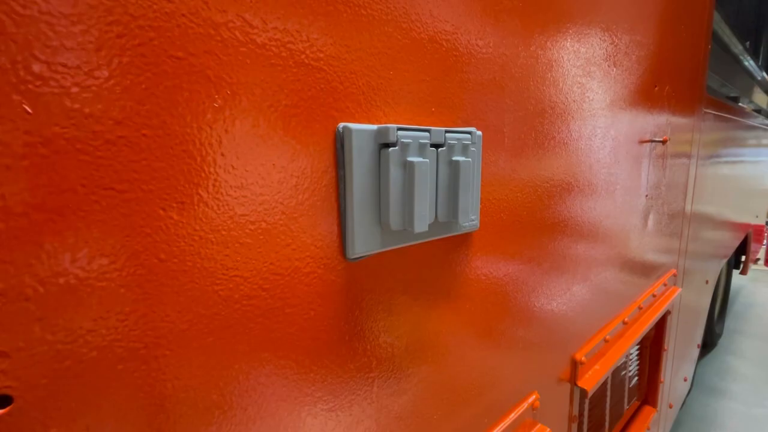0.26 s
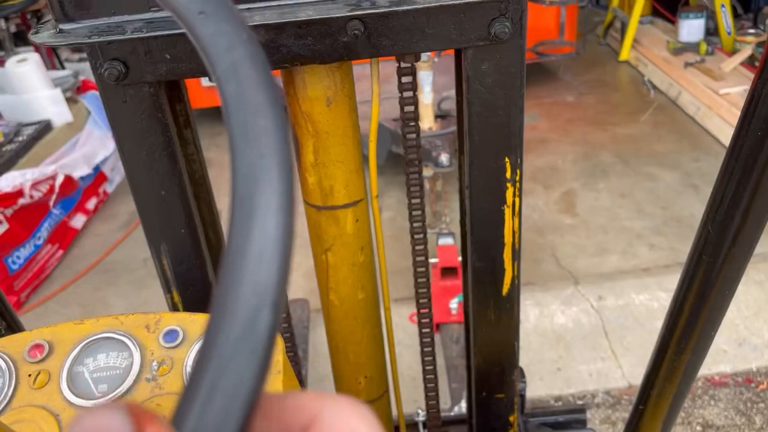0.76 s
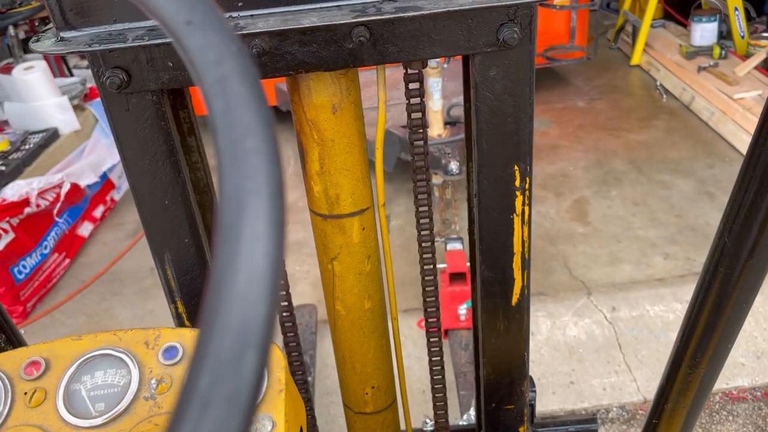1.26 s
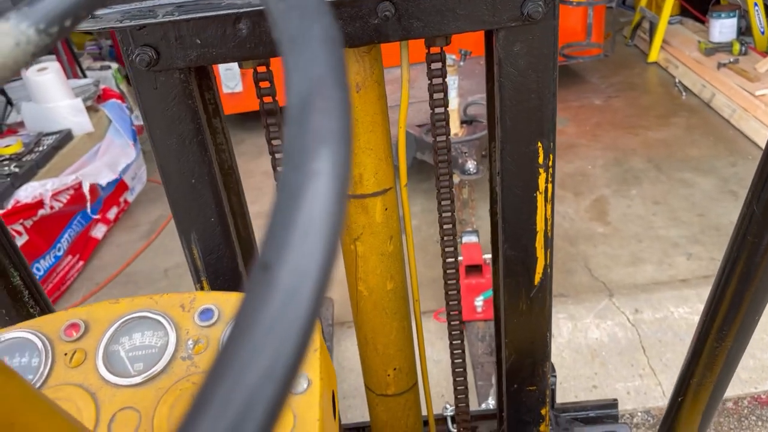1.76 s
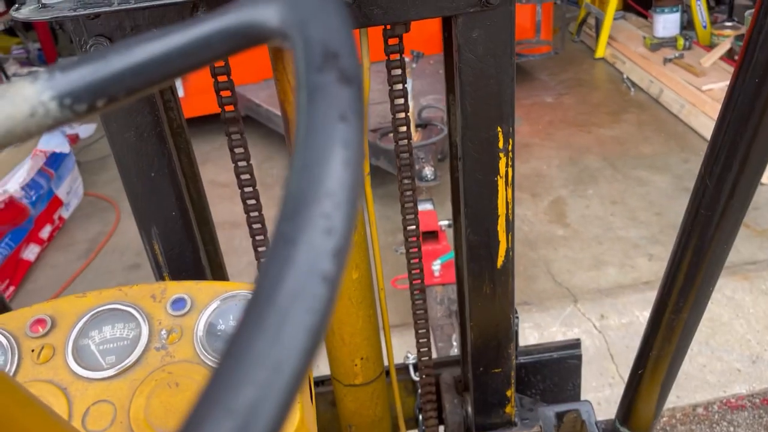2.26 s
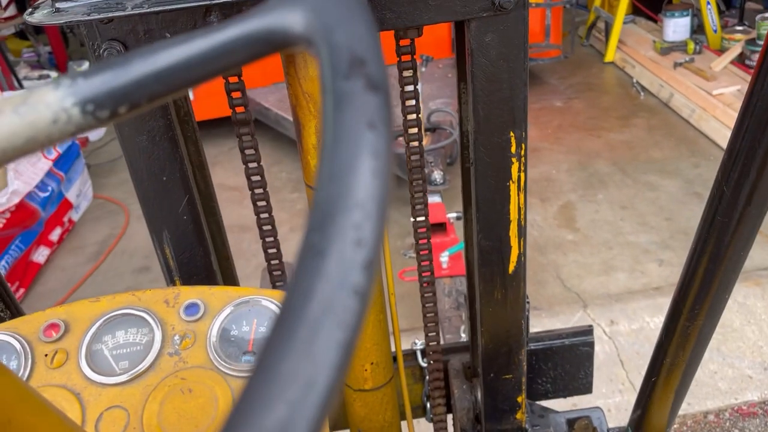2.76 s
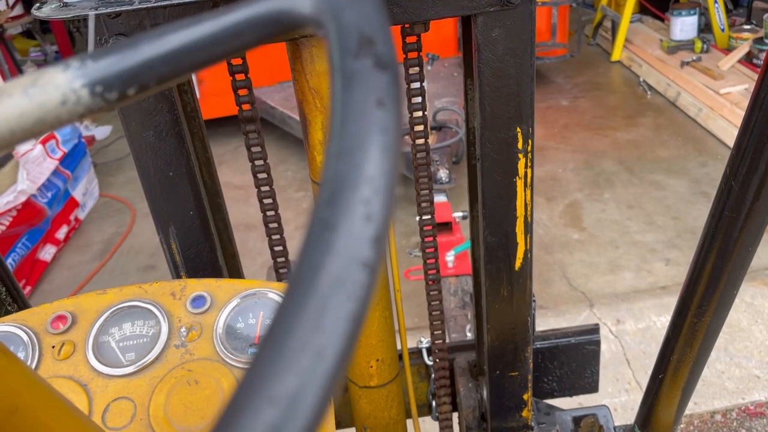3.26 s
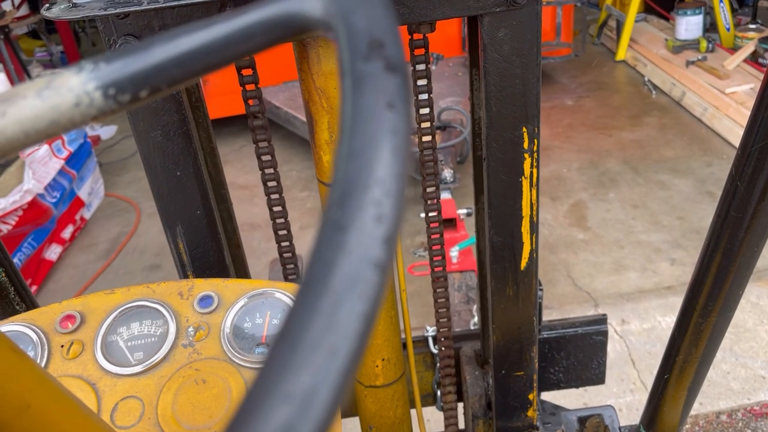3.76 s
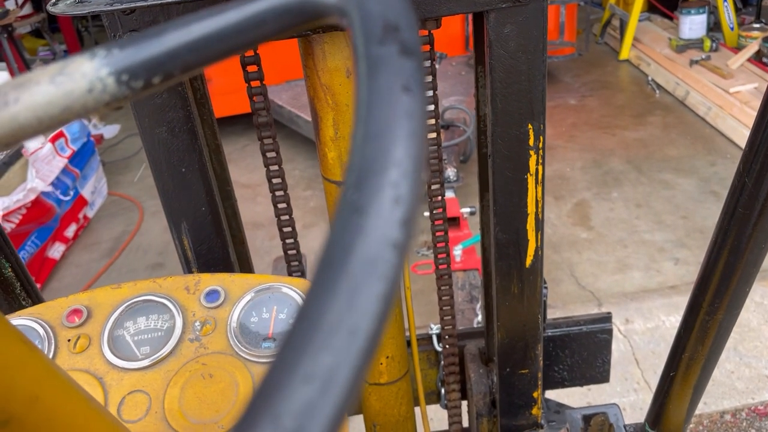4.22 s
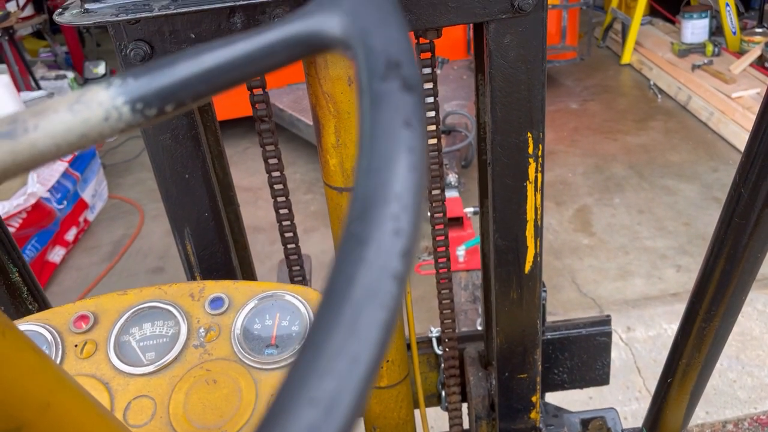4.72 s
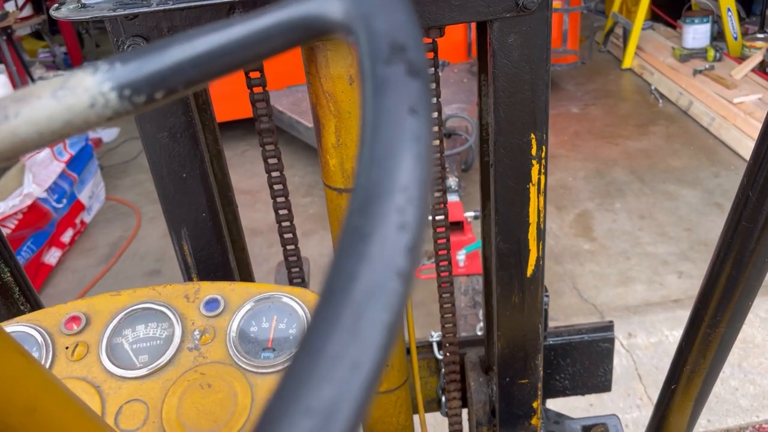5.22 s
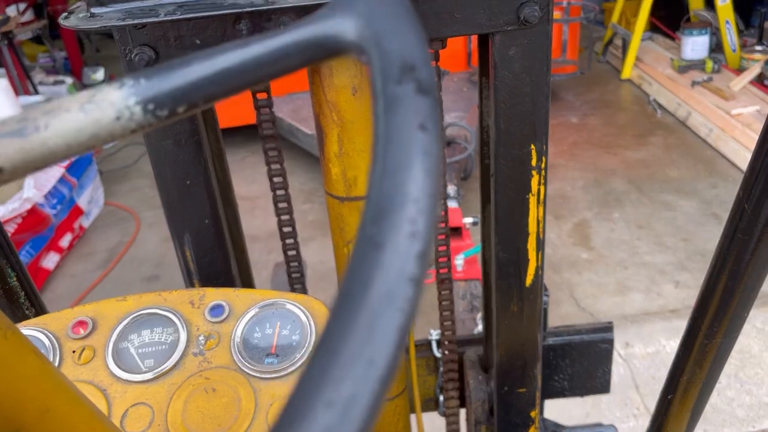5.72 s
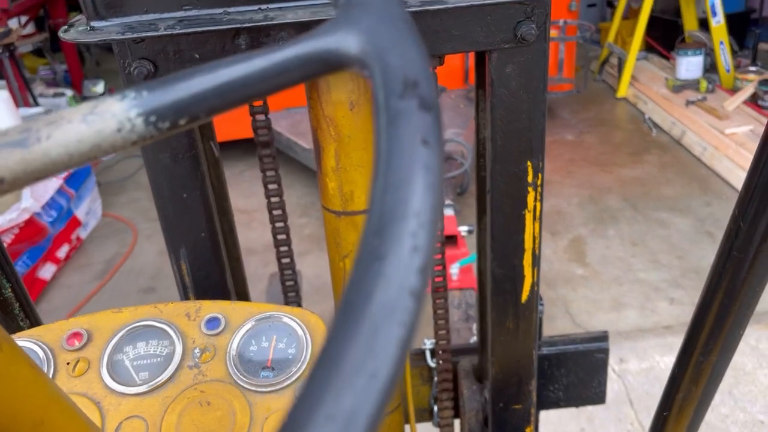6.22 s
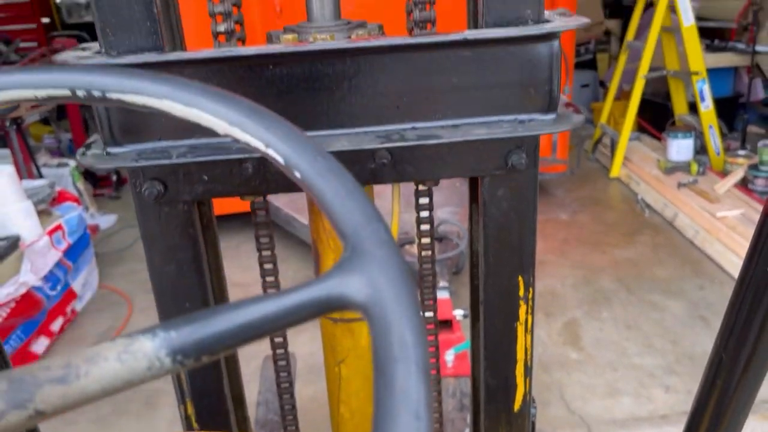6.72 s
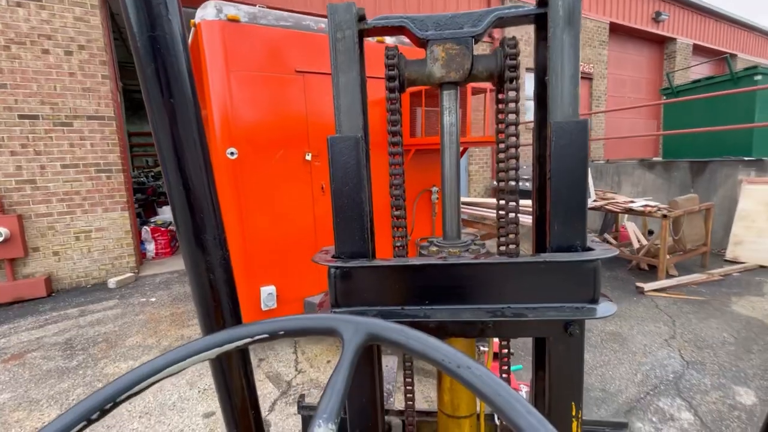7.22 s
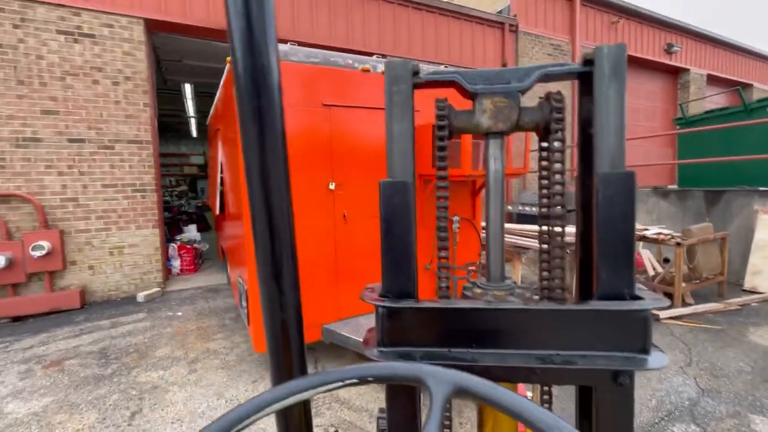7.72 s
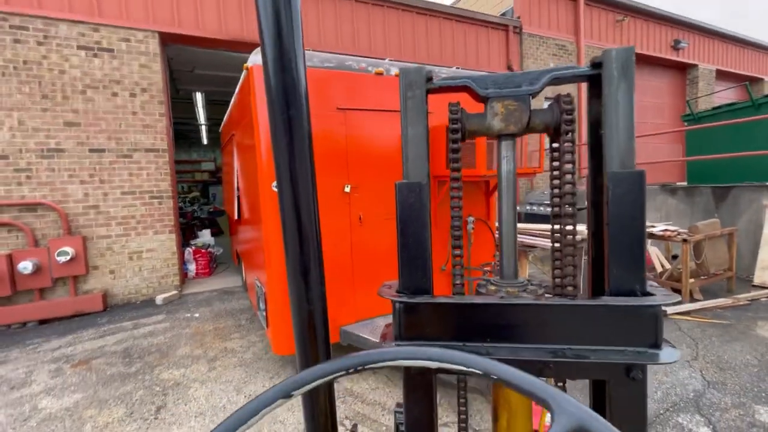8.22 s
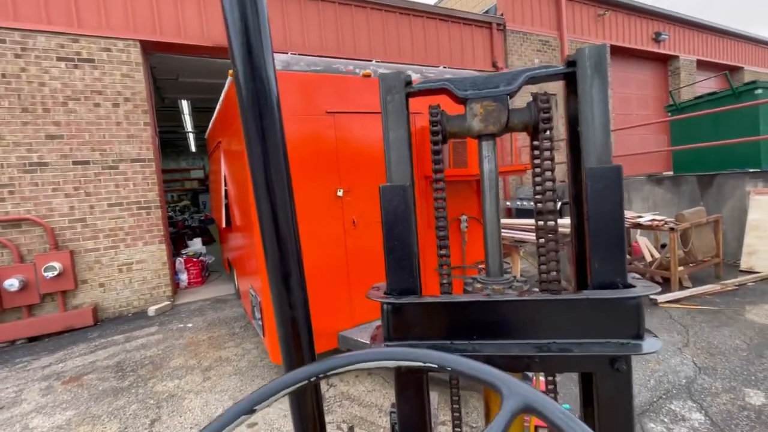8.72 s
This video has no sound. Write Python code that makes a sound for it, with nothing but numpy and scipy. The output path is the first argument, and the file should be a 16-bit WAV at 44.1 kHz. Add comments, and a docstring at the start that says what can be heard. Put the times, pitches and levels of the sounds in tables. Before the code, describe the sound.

A faint, distant low hum hangs over a yard outside a workshop. At about 0.6 seconds an old four-cylinder forklift engine is suddenly there, close, heard from the driver's seat. It runs unevenly, with dull spits until 1.2 seconds, and steadies by 1.5 seconds into a low, throbbing idle with a regular hollow knock, rattling loose steel and ticking valves. A faint click comes near 2 seconds. From 4.5 seconds the engine picks up speed. A light clank at 5.7 seconds and a heavy steel clank at 5.9 mark the gear engaging, and the speed creeps higher. At 6.9 seconds, with a soft low bump, the sound jumps to a slightly different position, with more clatter. The engine eases back until about 8.2 seconds, then revs sharply with a louder growl, staying high to the end at 9 seconds.

```python
"""Outside a workshop, in the driver's seat of an old four-cylinder forklift.
After a distant hum the engine is suddenly there, spitting while cold; it idles, picks up, clanks into
gear, settles and, heard from a second spot, revs again. The firings are a periodic excitation: their
harmonics (orders) throb in silencer and body, and each impulse rings the exhaust pipe, the sheet-metal
hood and loose steel. One cylinder hits harder than the rest and so accents every fourth firing."""
import sys
import numpy as np
from scipy import signal
from scipy.fft import rfft, irfft, next_fast_len
from scipy.io import wavfile
from scipy.ndimage import uniform_filter1d, minimum_filter1d, map_coordinates

SR = 44100
rng = np.random.default_rng(int(sys.argv[2]) if len(sys.argv) > 2 else 0)


def store_wav(level_fs):
    """Save 16-bit WAV to argv[1]."""
    pcm = np.round(np.clip(np.atleast_2d(level_fs), -1, 1) * 32767)
    wavfile.write(sys.argv[1], SR, pcm.T.astype(np.int16))


N = 396018

# Levels within a spectrum or a set of modes are relative; t60 is the time of a 60 dB decay.
# likeness of the two ears: f/Hz, coherence/1
COHERENCE = [(60, 0.99), (360, 0.9), (650, 0.22), (1300, 0.35), (2500, 0.47), (5000, 0.39), (8500, 0.53),
             (12000, 0.22)]
# outdoor noise spectrum and partials of the distant hum: f/Hz, level/dB
YARD_SPECTRUM = [(15, -40), (25, -38), (60, 4.5), (108, -7), (257, -7.5), (563, -20), (878, -11.5),
                 (1080, -17.5), (2190, -21), (5480, -28), (6760, -30.5), (10800, -54.5), (13000, -47)]
HUM_PARTIALS = [(57.3, -50), (114.7, -72)]
# soft low bumps with faint clicks where the sound jumps: t/s, bump width/s, bump level/dB, click level/dB
BUMP_EVENTS = [(1.96, .004, -50, -42), (6.893, .008, -28, -40)]
# spits of the cold engine: t/s, level/dB
SPIT_EVENTS = [(.643, -27), (0.695, -28), (.703, -35), (.817, -31.5), (0.889, -30), (0.908, -29.5),
               (1.032, -26), (1.142, -32), (1.189, -33)]
# heavy steel clanks: t/s, level/dB, relative treble level/dB, t60/s
CLANK_EVENTS = [(5.702, -31, -8, 0.11), (5.709, -31.5, -0.5, 0.084), (5.865, -15.5, -20.5, 0.086),
                (5.877, -23.5, -9, 0.11), (5.889, -32, -10, .08), (5.912, -34, -17, 0.17)]

# spectra that colour each source: f/Hz, level/dB
SPIT_SPECTRUM = [(60, -12), (150, 4), (260, -2), (420, 3), (570, -4), (700, -19), (1000, -30), (3000, -55)]
CLANK_SPECTRUM = [(250, 12), (500, 11.5), (900, -1), (1300, -10), (1700, -2), (2300, 2), (2900, 1),
                  (3300, -10), (3800, -11.5), (8000, -22)]
FAN_SPECTRUM = [(150, -5), (330, 1), (550, 2), (1100, -3), (2500, -12.5), (6000, -9.5), (9000, -19),
                (12500, -33)]
RUMBLE_SPECTRUM = [(15, -48), (40, 7.5), (90, 13), (180, -15.5), (400, -66)]
RATTLE_SPECTRUM = [(300, -2), (520, -0.5), (800, 2.5), (1300, -4), (2300, -5.5), (3000, -19), (4500, -61)]
TICK_SPECTRUM = [(1500, -20.5), (2800, -9), (3500, -0.5), (4400, -0.5), (5100, 1.5), (5900, -0.5),
                 (6800, -10.5), (8600, -10), (11300, -8), (12500, -24.5), (13400, -62)]
SNARL_SPECTRUM = [(150, -2.5), (200, 3.5), (250, -21.5), (335, -0.5), (400, -0.5), (490, -6), (620, -22)]
CRACK_SPECTRUM = [(300, -21), (480, 23), (600, -5), (800, -36), (1500, -28), (3000, -54)]
HOLLOW_SPECTRUM = [(250, -17), (560, 5), (900, -15), (2000, -33)]
HOOD_SPECTRUM = [(100, -14), (330, 3.5), (400, 1), (600, -1), (1100, -6.5)]
PIPE_SPECTRUM = [(60, -12), (100, 1.5), (280, -4.5), (400, -2), (800, -37)]

# driven resonances of air columns and steel, and the faint whine of the cold engine: f/Hz, bandwidth/Hz,
# level/dB
SPIT_WHINE_MODES = [(830, 6.2, 18.5)]
CLANKING_STEEL_MODES = [(880, 160, 1), (1620, 260, -0.5), (2200, 330, 0.5), (2840, 280, 0), (3570, 200, -9)]
BLOCK_MODES = [(317, 64, 7), (493, 64, 1.5), (695, 89, -4), (887, 46, -1.5), (1093, 72, -6.5),
               (1334, 130, -7), (1757, 160, -6.5), (2060, 190, -10.5), (2540, 79, -8), (2977, 110, -8.5),
               (3410, 140, -12)]
HOLLOW_MODES = [(591, 16, -5), (732, 30, -17), (880, 25, -12)]
HOOD_MODES = [(260, 18, -21.5), (412, 17.8, 2.5), (463, 24, -6.5), (523, 47, -12)]
PIPE_MODES = [(105.4, 23, -3.5), (203.8, 40, -1.5), (268, 85, -5.5), (324, 57, -14.5)]
SILENCER_MODES = [(61.6, 27.2, 0)]
FLOOR_MODES = [(89.1, 7, -35.5)]
COWL_MODES = [(120, 15, 0)]
DRONE_MODES = [(210, 12.3, 0)]
# free vibration of loose brackets, valve cover and hood: f/Hz, level/dB, t60/s
BRACKET_RINGS = [(1065, -0.5, 0.1), (1255, 7, 0.15), (1329, 10, 0.11), (1634, 8, 0.1), (1738, 8, 0.12),
                 (1895, 8, 0.1), (2135, 0, 0.17), (2333, 7, 0.11), (2470, 6, 0.12), (2736, 3.5, 0.11)]
COVER_RINGS = [(3170, 5, 0.076), (3367, 2.5, 0.083), (3677, 0.5, 0.072), (3887, 0.5, 0.088),
               (4110, 0, 0.097), (4375, 6, 0.084), (4650, 5.5, 0.077), (5330, 7.5, 0.058),
               (5720, 5.5, 0.079), (5930, 7, 0.061), (6380, 5, 0.04), (8140, 2, 0.045), (8800, 4, 0.04)]
HOOD_RINGS = [(420, 0, .17), (475, -2, .07)]

# engine speed: t/s, firing rate/Hz
FIRING_RATE = [(0.56, 22.44), (0.9, 22.81), (1.4, 21.76), (2.04, 22.61), (4.08, 22.34), (4.55, 22.62),
               (5.3, 27.8), (5.81, 28.72), (6.03, 28.7), (6.49, 30.67), (7.04, 31.1), (7.44, 28.06),
               (7.81, 26.33), (8.17, 25.72), (8.37, 27.01), (8.81, 41.05), (8.98, 41.91)]
# the sound cuts in, then jumps twice to another moment of the run:
# t/s, crank offset/firings, left-ear lag/ms
SOUND_JUMPS = [(.561, 1.468, .02), (1.96, 2.988, .02), (6.89, 3.681, .27)]
# load set by the throttle, negative when coasting: t/s, pull/1
THROTTLE_PULL = [(1.4, -0.0014), (2.1, 0.042), (4.45, 0.095), (4.65, 0.24), (5.2, 0.11), (5.6, 0.07),
                 (6.1, 0.097), (6.85, 0.2), (7.3, -0.36), (7.9, -0.25), (8.33, 0.15), (8.43, 0.67),
                 (8.65, 0.75), (8.98, 0.56)]
# cylinders in firing order: exhaust level/dB, hood level/dB, rattle level/dB, knock delay/firings
CYLINDER_BLOWS = [(-4.5, -2, 3.5, -0.012), (-3.5, 1.5, 6.5, 0.0233), (-5.5, -0.5, 5, -0.022),
                  (-4.5, -1, 3.7, -0.024)]
# each part's level law: idle level/dB, then change/dB per octave of speed, at full pull, while cold,
# in gear and at the second spot
PART_LEVELS = {"second order": (-26.5, 8, 1, -2, -3.5, 0.5), "third order": (-26, 2, 7, -1, -3, 2.5),
               "fifth order": (-40.5, -11, 7, -2, -2, -1.5), "cowl": (-45, 4, 1, -2, 2, 7.5),
               "drone": (-53, -1, 14, -2, 13, -7.5), "upper orders": (-58.5, 10, 14.5, 1, 3.5, -2.5),
               "fan": (-55, 18, 8, -2, -7.5, -1), "exhaust": (-35.5, -1.5, 5.5, 1.5, 0.5, -3),
               "hood": (-40.5, 1.5, 3, -2, -2, -6.5), "hollow knock": (-56, -7.5, 1, 5, -1, 9),
               "growl": (-51, 7, 16, 3, -3, 1.5), "rattle": (-48.5, 5.5, 7.5, 0.5, -6, 6),
               "valve ticks": (-48, -0.5, 11.5, 0, -5, 4), "unevenness": (-3, 3.5, -1, 9, -0.5, 1.5)}
# microphone response at the first spot and at the second, with the engine to one side: f/Hz, gain/dB
FACING_RESPONSE = [(6200, -0.5), (6800, -4), (7500, 1.5), (8200, 6.5), (9400, 6.5), (10300, -13.5),
                   (11000, -1)]
TURNED_RESPONSE = [(1600, 0.5), (1790, 0.5), (2000, 0), (4300, -2.5), (5800, 1.5), (6700, 2), (7350, -2.5),
                   (8200, 5), (9400, 11.5), (10500, -12.5), (11400, 4), (12300, 3)]

ENGINE_HEARD_S, SECOND_SPOT_S = SOUND_JUMPS[0][0], SOUND_JUMPS[-1][0]
IDLE_HZ = 22.5  # firing rate
WARM_S, CLEARING_S = 1.48, 0.17  # uneven cold burning is over at WARM_S
GEAR_S, GEAR_TAKE_UP_S = 5.87, 0.056  # the drive engages and takes up the slack in loose parts
TIME = np.arange(N) / SR


def amp(db):
    """Amplitude ratio of a level in decibels."""
    return 10 ** (np.asarray(db) / 20)


def unit(x):
    """Normalisation to rms 1."""
    return x / np.sqrt(np.mean(x ** 2) + 1e-20)


def noise():
    """Two uncorrelated channels of white noise."""
    return rng.standard_normal((2, N))


def along(points, hz):
    """Interpolation of (f/Hz, value) points on a logarithmic frequency axis."""
    f, values = np.transpose(points)
    return np.interp(np.log(hz + 1), np.log(f), values)


def curve(points):
    """Linear interpolation of (t/s, value) points at every sample."""
    return np.interp(TIME, *np.transpose(points))


def wobble(knot_hz):
    """Smooth random modulation: a spline through Gaussian knots."""
    knots = rng.standard_normal(int(N * knot_hz / SR) + 4)
    grid = np.linspace(0, len(knots) - 1, 10 * len(knots))
    return np.interp(TIME * knot_hz, grid, map_coordinates(knots, [grid]))


def filtered(x, response):
    """Linear filtering: the spectrum of x times a frequency response."""
    m = next_fast_len(N + SR // 2)
    return irfft(rfft(x, m) * response(np.fft.rfftfreq(m, 1 / SR)), m)[..., :N]


def coloured(x, spectrum):
    """Spectral shaping by (f/Hz, level/dB) points, at rms 1."""
    return unit(filtered(x, lambda hz: amp(along(spectrum, hz))))


def resonances(x, modes):
    """Modal superposition: x drives parallel damped resonators of alternating sign."""
    return filtered(x, lambda f: sum((-1) ** k * amp(db) * 1j * f * bw / (f0 ** 2 - f ** 2 + 1j * f * bw)
                                     for k, (f0, bw, db) in enumerate(modes)))


def placed(times, sounds):
    """Superposition of short sounds (channels, events, samples), each starting at its time."""
    at = (np.maximum(times, 0) * SR).astype(int)[:, None] + np.arange(sounds.shape[-1])
    return np.array([np.bincount(at.ravel(), channel.ravel(), N)[:N] for channel in sounds])


def stereo(pair):
    """Partial coherence: two unrelated signals as mid and side make the bass alike, the treble apart."""
    side_gain = lambda hz: np.tan(np.arccos(np.clip(along(COHERENCE, hz), 0, 1)) / 2)
    mid, side = pair[0], filtered(pair[1], side_gain)
    return np.array([mid + side, mid - side])


def strengths(period, db, scatter_db):
    """Log-normal blow amplitudes; the root of the period keeps mean power independent of firing rate."""
    return amp(db + scatter_db * rng.standard_normal(len(period))) * np.sqrt(period)


def bursts(times, cylinder, size, attack_s, t60, repeat, spiky_db):
    """Tiny impacts merge into decaying noise; the share `repeat` of its power recurs with its cylinder."""
    t = np.arange(SR // 10) / SR
    own = rng.standard_normal((2, len(CYLINDER_BLOWS), len(t)))[:, cylinder]
    fresh = rng.standard_normal((2, len(times), len(t)))
    impacts = repeat ** .5 * own + (1 - repeat) ** .5 * fresh
    envelope = size[:, None] * amp(-60 * t / t60) * (1 - np.exp(-t / attack_s))
    return placed(times, impacts * envelope) * amp(spiky_db * wobble(700))


def rasps(times, period, size, attack, hold, fall_db, spiky_db):
    """Noise amplitude-modulated by the crank: attack and hold in firings, then fall_db per firing."""
    turn = np.arange(SR // 14) / SR / period[:, None]
    shape = (1 - np.exp(-turn / attack)) * amp(-fall_db * np.maximum(turn - hold, 0))
    envelope = placed(times, (size[:, None] * shape)[None])
    return envelope * noise() * amp(spiky_db * wobble(600))


def rings(times, size, modes, scatter_db, detune, attack_s):
    """Damped free vibration: each blow shares its energy anew among modes that detune as parts shift."""
    t = np.arange(SR // 11) / SR
    ringing = np.zeros((2, len(times), len(t)))
    for hz, db, t60 in modes:
        pitch, strength = rng.standard_normal((2, len(times), 1), np.float32)
        phase = rng.random((2, len(times), 1), np.float32)
        wave = np.sin(2 * np.pi * (hz * (1 + detune * pitch) * t + phase))
        ringing += wave * amp(db + scatter_db * strength - 60 * t / t60)
    blow = size[:, None] / ringing.std(axis=-1, keepdims=True)
    return unit(placed(times, ringing * blow * (1 - np.exp(-t / attack_s))))


def struck(times, cylinder, size, modes, rough, t60):
    """Impulse excitation: a clean push per firing and a flurry, `rough` times as strong, ring the modes."""
    push = unit(resonances(placed(times, size[None, :, None]), modes))
    flurry = bursts(times, cylinder, size, attack_s=.0023, t60=t60, repeat=.5, spiky_db=3.5)
    flurry = unit(resonances(flurry, modes))
    return (push * [[1], [0]] + rough * flurry) / np.sqrt(1 + rough ** 2)  # the push is mid only


def steel(x, t60, patchy_db):
    """High modal density: steel rings on as a noise-like tail, and which modes are hit keeps changing."""
    t = np.arange(SR // 8) / SR
    tail = rng.standard_normal((2, len(t))) * amp(-60 * t / t60)
    ringing = signal.fftconvolve(x, tail, axes=1)[:, :N]
    spectra = signal.stft(ringing, nperseg=512)[2]
    patch = np.outer(np.hanning(7), np.hanning(11))  # frequency bins by time frames
    patches = unit(signal.fftconvolve(rng.standard_normal(spectra.shape[1:]), patch, "same"))
    return signal.istft(spectra * amp(patchy_db * patches), nperseg=512)[1][:, :N]


def yard():
    """Ambient noise floor, with a distant two-partial hum that stops when the engine enters."""
    hum = sum(np.sqrt(2) * amp(db) * np.sin(2 * np.pi * hz * TIME) for hz, db in HUM_PARTIALS)
    return hum * (TIME < ENGINE_HEARD_S) + amp(-49) * stereo(coloured(noise(), YARD_SPECTRUM))


def bumps(click_t60=.0013):
    """A soft low bump with a faint click where the sound jumps; a smooth pulse holds only bass."""
    hiss = np.diff(rng.standard_normal(N + 1))
    sound = np.zeros(N)
    for start, width, bump_db, click_db in BUMP_EVENTS:
        age = TIME - start
        sound += amp(bump_db) * np.exp(-(age / width) ** 2)
        sound += (age > 0) * amp(click_db - 60 * np.abs(age) / click_t60) * hiss
    return sound


def spits(attack_s=.00095, t60=.087, cutoff_hz=800):
    """Narrow resonance: each dull cough of the cold engine comes with a faint, thin whine near 830 Hz."""
    times, db = np.transpose(SPIT_EVENTS)
    t = np.arange(SR // 10) / SR
    shapes = amp(db[:, None] - 60 * t / t60) * (1 - np.exp(-t / attack_s))
    envelope = placed(times, shapes[None])
    cough = envelope * np.tanh(1.3 * coloured(noise(), SPIT_SPECTRUM))
    cough = filtered(cough, lambda hz: 2.16 / (1 + (hz / cutoff_hz) ** 6))
    return stereo(cough + resonances(envelope * noise(), SPIT_WHINE_MODES))


def clanks():
    """Impact of heavy steel parts: broad modes decay exponentially under a bright edge."""
    times, db, treble_db, t60 = np.transpose(CLANK_EVENTS)
    t = np.arange(SR // 4) / SR
    decay = lambda start_db: placed(times, amp(start_db[:, None] - 60 * t / t60[:, None])[None])
    crash = coloured(noise(), CLANK_SPECTRUM)
    ringing = unit(resonances(noise(), CLANKING_STEEL_MODES))
    edge = coloured(noise(), TICK_SPECTRUM)
    return stereo(decay(db) * unit(crash + .95 * ringing) + decay(db + treble_db) * edge)


def rumble(rough):
    """Low-frequency random noise that grows with the engine's unevenness."""
    return amp(-42.5 + 2 * rough) * coloured(noise(), RUMBLE_SPECTRUM)


def fan(db):
    """Broadband flow noise: the rush of the cooling fan."""
    return amp(db) * coloured(noise(), FAN_SPECTRUM)


def growl(times, period, db):
    """Combustion noise: each firing is a short, hard blow that rings the modes of the block."""
    size = strengths(period, 0, scatter_db=2)
    blows = rasps(times, period, size, attack=.03, hold=.12, fall_db=70, spiky_db=2)
    return amp(db) * unit(resonances(blows, BLOCK_MODES))


def rattle(times, period, size, db):
    """Repeated impact: loose brackets chatter and ring in the midrange at each firing."""
    chatter = rasps(times, period, size, attack=.06, hold=.24, fall_db=14.5, spiky_db=3.5)
    chatter = coloured(steel(chatter, t60=.13, patchy_db=3), RATTLE_SPECTRUM)
    ringing = rings(times + .003, size, BRACKET_RINGS, scatter_db=4, detune=.012, attack_s=.006)
    return amp(db) * unit(chatter + .75 * ringing)


def valve_ticks(times, period, size, db):
    """Impact noise: the valve gear ticks and excites the treble modes of its cover."""
    ticks = rasps(times, period, size, attack=.066, hold=.19, fall_db=16, spiky_db=1.5)
    ticks = coloured(steel(ticks, t60=.077, patchy_db=4), TICK_SPECTRUM)
    ringing = rings(times + .004, size, COVER_RINGS, scatter_db=5.5, detune=.011, attack_s=.007)
    return amp(db) * unit(ticks + .9 * ringing)


def snarl(crank, db):
    """Harmonic series: orders 5 to 15 of the firing rate, filtered by the body."""
    lines = sum(np.cos(2 * np.pi * (order * crank + rng.random())) for order in range(5, 16))
    return amp(db) * coloured(lines, SNARL_SPECTRUM)


def hard_knock(times, cylinder, period, is_hardest, idling, level):
    """Subharmonic accent: once a cycle the hardest cylinder lands early with a crack and a hollow ring."""
    size = strengths(period, 0, scatter_db=.8) * is_hardest
    early = times - .0651 * period
    softened = size * idling  # crack and chug fade as the engine speeds up
    crack = bursts(early, cylinder, softened, attack_s=.00024, t60=.034, repeat=.87, spiky_db=0)
    crack = amp(-16) * coloured(crack, CRACK_SPECTRUM)
    chug = rings(early, softened, HOOD_RINGS, scatter_db=1.5, detune=.012, attack_s=.003)
    chug = amp(-7) * chug * [[1.3], [.4]]  # mid, side
    hollow = coloured(struck(early, cylinder, size, HOLLOW_MODES, rough=1, t60=.17), HOLLOW_SPECTRUM)
    return amp(level["hood"]) * (crack + chug) + amp(level["hollow knock"]) * hollow


def hood(times, cylinder, period, knock_db, rough, db, jitter_s=.00042):
    """Panel resonance: each firing knocks the sheet-metal hood, a little early or late."""
    knocks = times + jitter_s * rng.standard_normal(len(times))
    size = strengths(period, knock_db, scatter_db=1.2)
    panel = struck(knocks, cylinder, size, HOOD_MODES, .68 * rough, t60=.19)
    return amp(db) * coloured(panel, HOOD_SPECTRUM)


def exhaust(times, cylinder, period, push_db, rough, db, delay_firings=.131):
    """Pipe resonance: a puff follows each firing and excites the modes of the air column."""
    size = strengths(period, push_db, scatter_db=.5)
    pipe = struck(times + delay_firings * period, cylinder, size, PIPE_MODES, 1.02 * rough, t60=.29)
    return amp(db) * coloured(pipe, PIPE_SPECTRUM)


def boom(crank, rate, level, delay_firings=.194):
    """Forced vibration: each low order swells as it crosses a resonance of silencer or body."""
    tone = lambda order: np.sqrt(2) * np.cos(2 * np.pi * order * (crank - delay_firings))
    second = amp(level["second order"] + .17 * wobble(32)) * tone(order=2)
    third = amp(level["third order"] + .15 * wobble(4.56)) * tone(order=3)
    throb = resonances(resonances(second + third, SILENCER_MODES), SILENCER_MODES)
    fifth = amp(level["fifth order"] + 1.1 * wobble(4.6)) * tone(order=5)
    shake = amp(1.5) * (rate / IDLE_HZ) ** 2 * tone(order=2)
    floor_plate = resonances(amp(wobble(2.45)) * tone(order=4) - shake, FLOOR_MODES)
    cowl = resonances(amp(level["cowl"]) * tone(order=3), COWL_MODES)
    drone = resonances(amp(level["drone"]) * tone(order=7), DRONE_MODES)
    return throb + fifth + floor_plate + cowl + drone


def crankshaft(rate):
    """Phase is the integral of frequency: crank position in firings, with the left-ear lag in samples."""
    starts, offsets, lags_ms = np.transpose(SOUND_JUMPS)
    row = np.maximum(np.searchsorted(starts, TIME) - 1, 0)
    return np.cumsum(rate) / SR + offsets[row], np.round(lags_ms[row] * SR / 1000).astype(int)


def firings(crank, rate):
    """Periodic excitation: time, cylinder and period at each whole number of the crank position."""
    at = np.flatnonzero(np.diff(np.floor(crank)) > 0)
    return at / SR, np.floor(crank[at]).astype(int) % len(CYLINDER_BLOWS), 1 / rate[at]


def part_levels(rate):
    """Gains add in decibels: each part's level follows speed, pull, cold, gear and listening spot."""
    octaves = np.log2(rate / IDLE_HZ)
    cold = np.clip((WARM_S - TIME) / CLEARING_S, 0, 1)
    in_gear = np.clip((TIME - GEAR_S) / GEAR_TAKE_UP_S, 0, 1)
    state = np.array([np.ones(N), octaves, curve(THROTTLE_PULL), cold, in_gear, TIME > SECOND_SPOT_S])
    return {part: np.array(law) @ state for part, law in PART_LEVELS.items()}


def engine():
    """Synchronous excitation: one crank times every blow and order, over fan noise and rumble."""
    rate = curve(FIRING_RATE)
    crank, lag = crankshaft(rate)
    times, cylinder, period = firings(crank, rate)
    level = part_levels(rate)
    rough = amp(level["unevenness"])
    push_db, knock_db, shake_db, knock_delay = np.array(CYLINDER_BLOWS)[cylinder].T
    is_hardest = knock_db == knock_db.max()
    idling = (period / period.max()) ** 4  # 1 at the lowest speed
    body = stereo(exhaust(times, cylinder, period, push_db, rough, level["exhaust"])
                  + hood(times + knock_delay * period, cylinder, period, knock_db, rough, level["hood"])
                  + hard_knock(times, cylinder, period, is_hardest, idling, level)
                  + rumble(rough) + fan(level["fan"]) + growl(times, period, level["growl"]))
    accent_db = 2 * is_hardest * idling * (times > SECOND_SPOT_S)
    shake = strengths(period, shake_db + accent_db, scatter_db=.75)
    onsets = times - .001
    brackets = rattle(onsets, period, shake, level["rattle"])
    valves = valve_ticks(onsets, period, shake, level["valve ticks"])
    clatter = stereo(brackets + valves) * amp([[-.6], [.6]])  # slightly to the right
    left, right = boom(crank, rate, level) + snarl(crank, level["upper orders"]) + body + clatter
    left = left[np.maximum(np.arange(N) - lag, 0)]  # the engine reaches the right ear first
    return (TIME > ENGINE_HEARD_S) * np.array([left, right])


def scene():
    """Superposition of the forklift and its yard."""
    return engine() + spits() + clanks() + bumps() + yard()


def limited(x, threshold=.2, firmness=.52, ahead_s=.0023, hold_s=.12, recover_db_per_s=45):
    """Peak compression: the gain drops by a share (firmness) of the excess level, holds, then recovers."""
    peak = np.abs(x).max(axis=0) + 1e-9
    needed_db = firmness * 20 * np.log10(np.minimum(threshold / peak, 1))
    hold, ahead = int(hold_s * SR), int(ahead_s * SR)
    held_db = minimum_filter1d(needed_db, hold, origin=(hold - 1) // 2)
    ramp_db = recover_db_per_s * TIME
    gain_db = np.minimum.accumulate(held_db - ramp_db) + ramp_db
    return x * amp(uniform_filter1d(minimum_filter1d(gain_db, ahead), ahead))


def record(dry):
    """Transduction: a response with two treble hollows, then compression, saturation and a low-pass."""
    saturation, cutoff_hz = .19, 13300
    facing = filtered(dry, lambda hz: amp(along(FACING_RESPONSE, hz)))
    turned = filtered(dry, lambda hz: amp(along(TURNED_RESPONSE, hz)))
    compressed = limited(np.where(TIME < SECOND_SPOT_S, facing, turned))
    rounded = compressed / (1 + np.abs(compressed / saturation) ** 6) ** (1 / 6)
    return filtered(rounded, lambda hz: 1 / (1 + (hz / cutoff_hz) ** 80))


dry = scene()
out = record(dry)
store_wav(out)
```